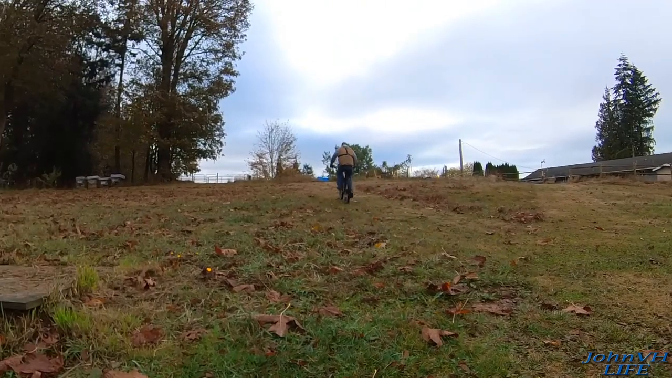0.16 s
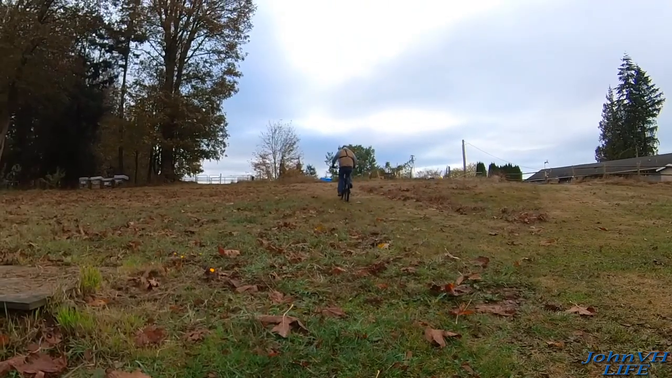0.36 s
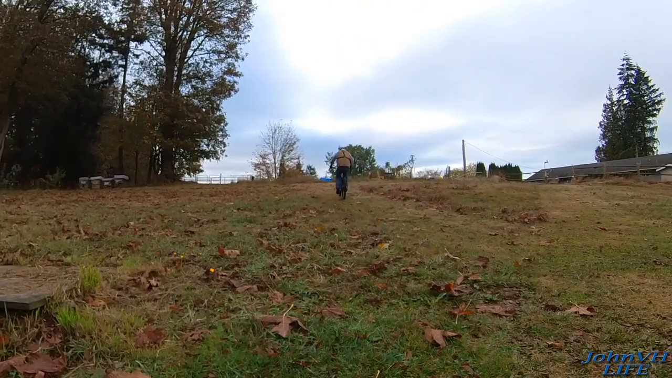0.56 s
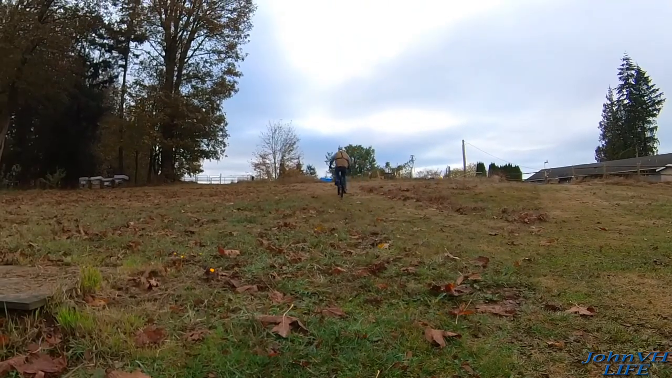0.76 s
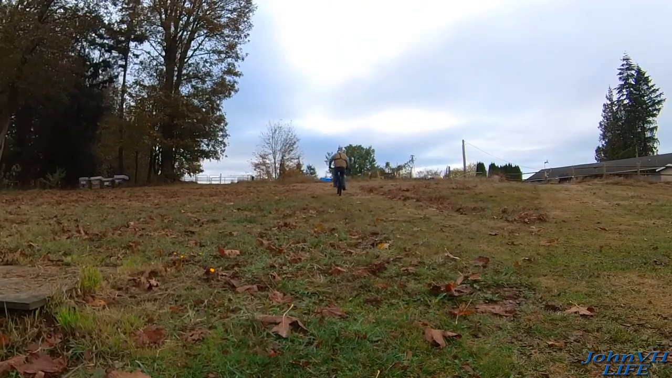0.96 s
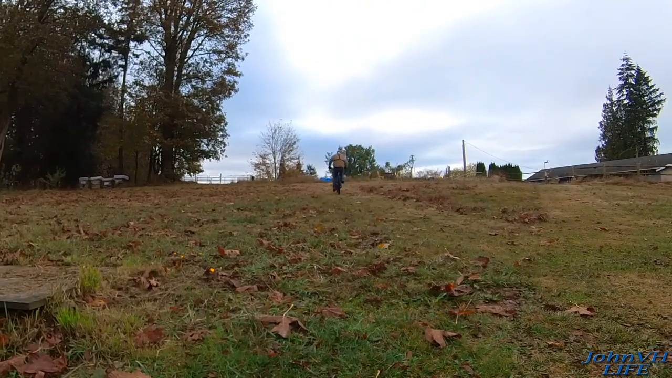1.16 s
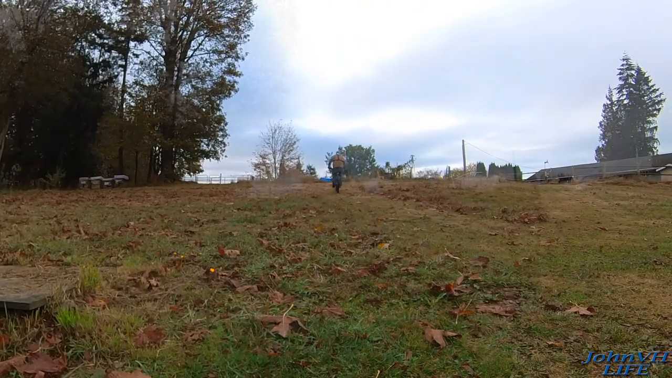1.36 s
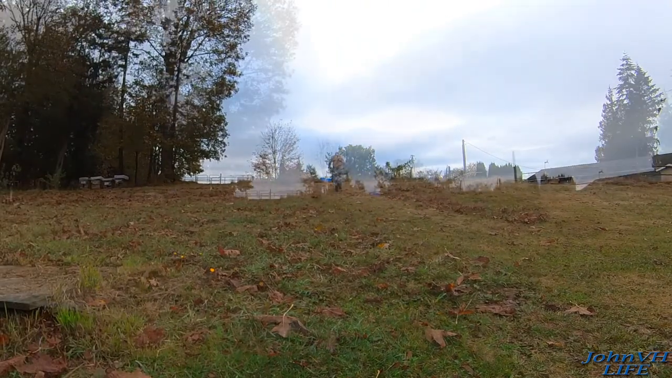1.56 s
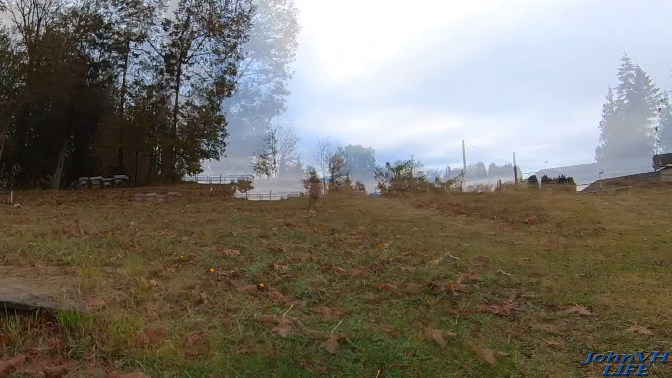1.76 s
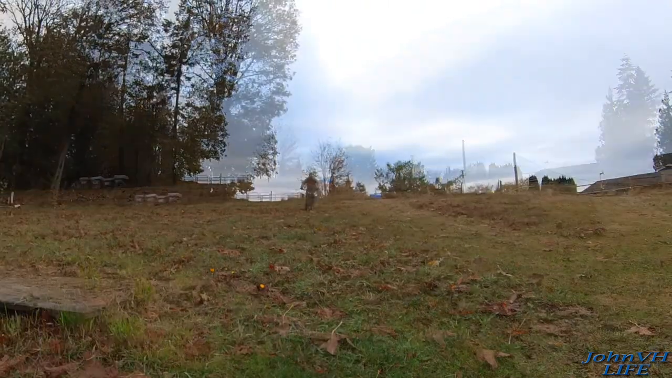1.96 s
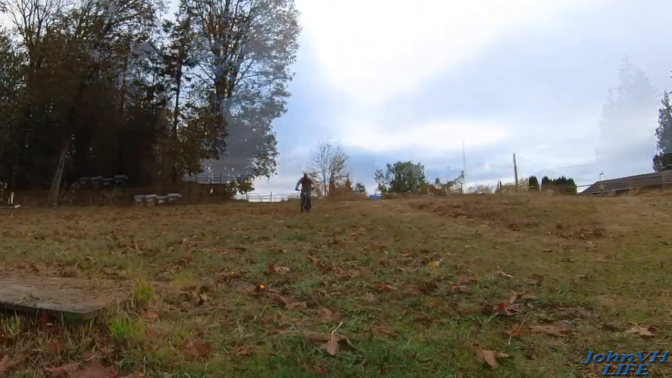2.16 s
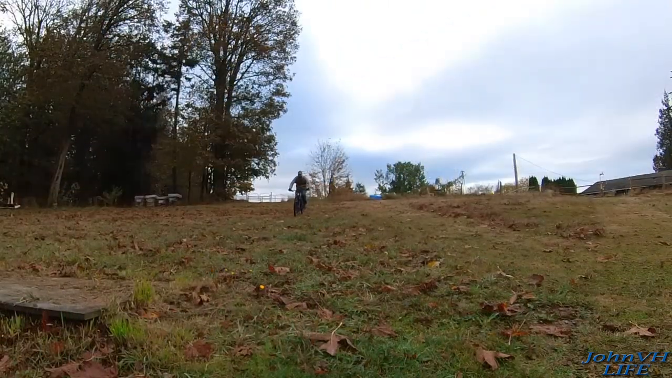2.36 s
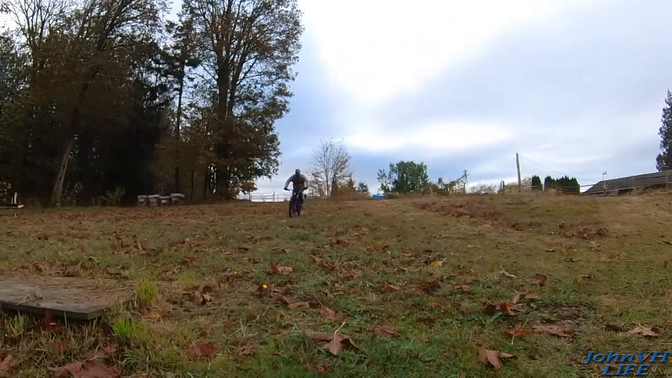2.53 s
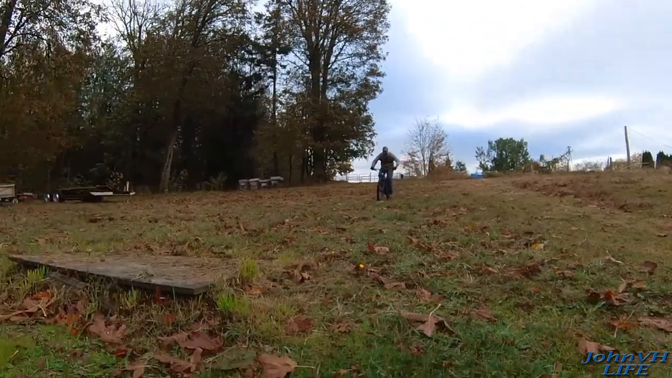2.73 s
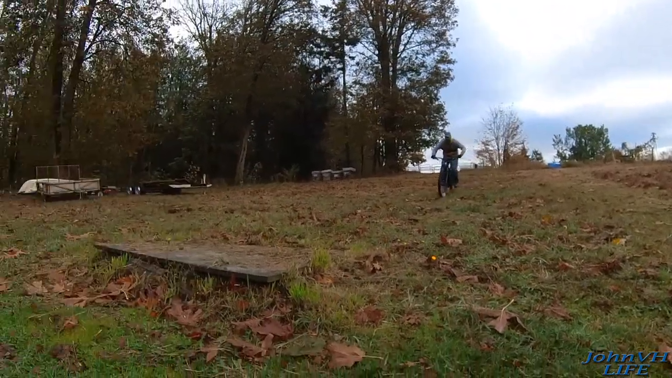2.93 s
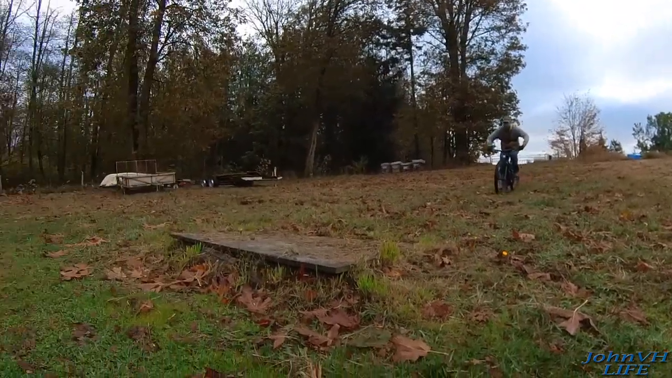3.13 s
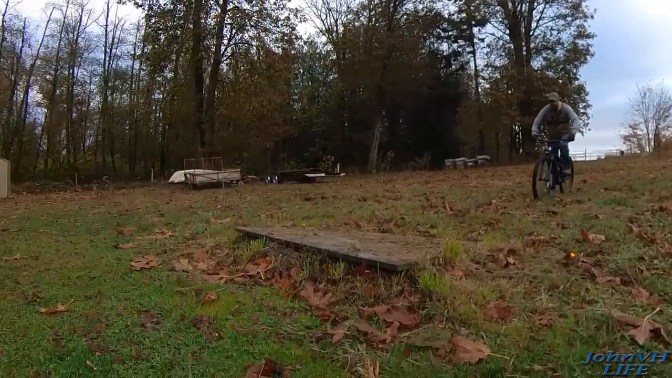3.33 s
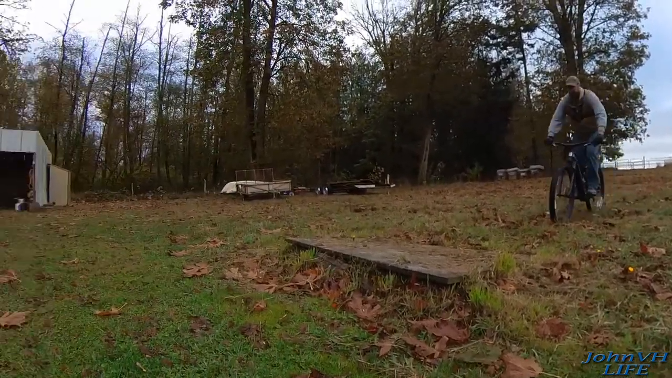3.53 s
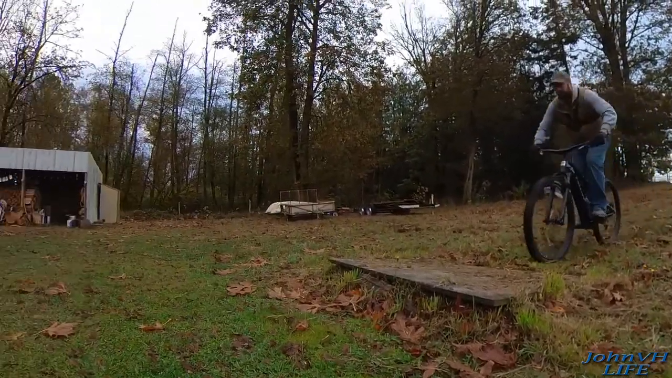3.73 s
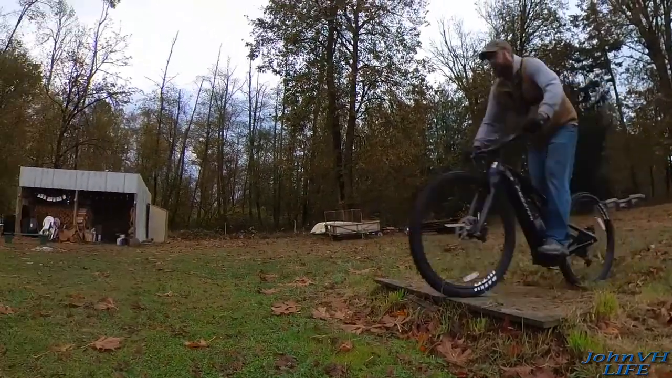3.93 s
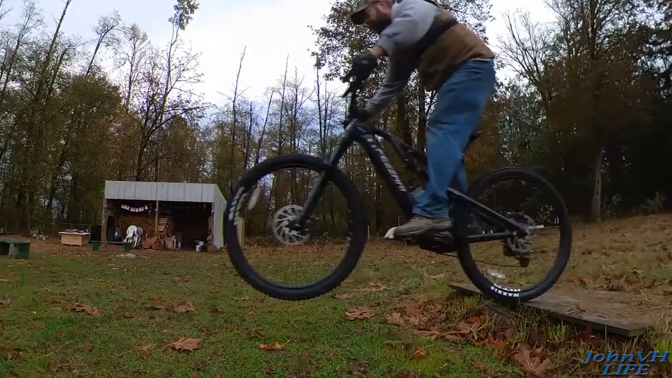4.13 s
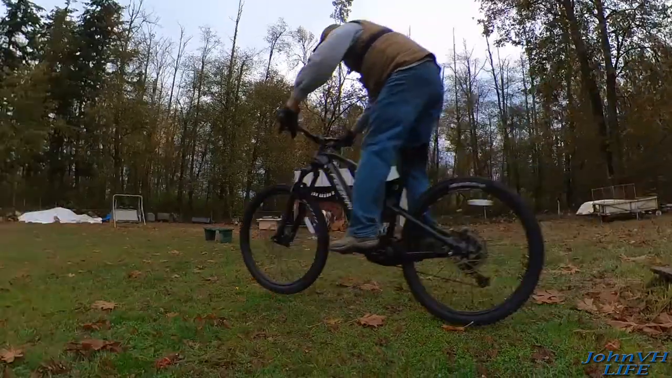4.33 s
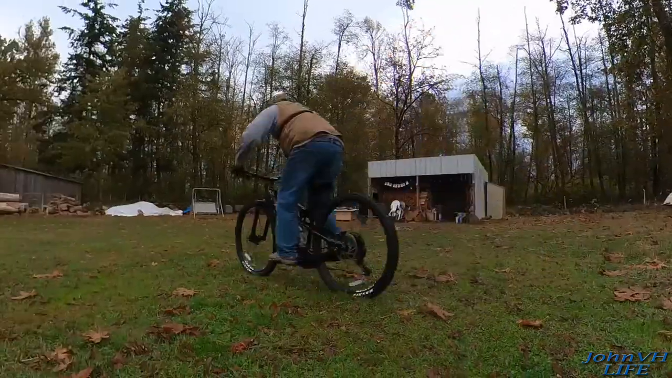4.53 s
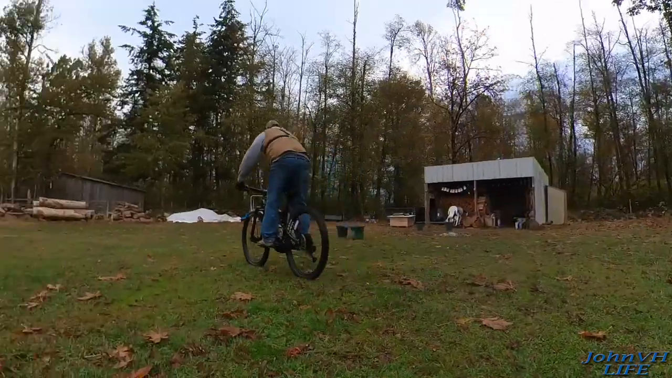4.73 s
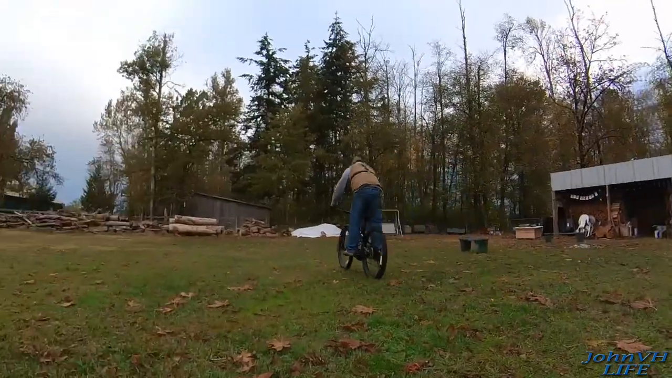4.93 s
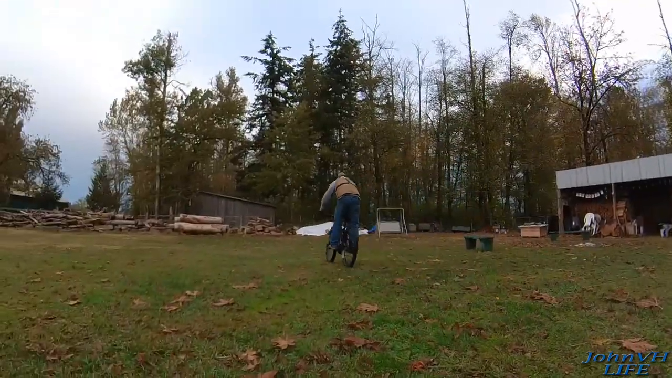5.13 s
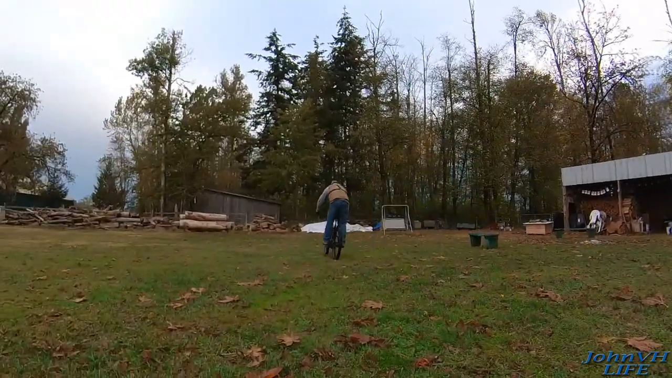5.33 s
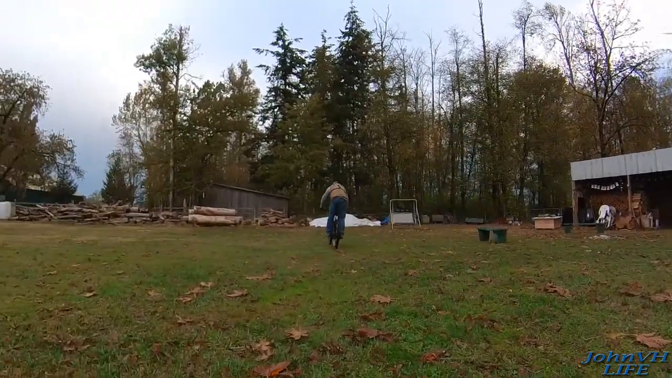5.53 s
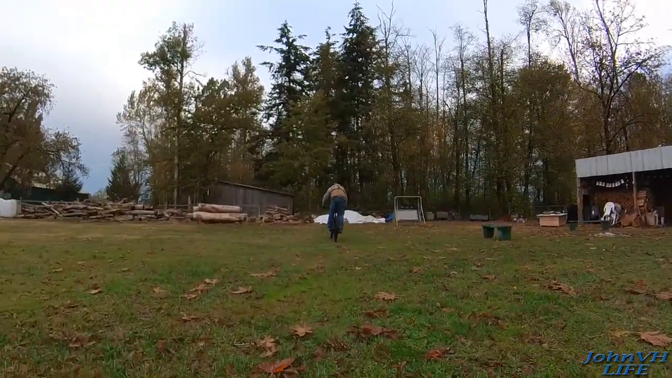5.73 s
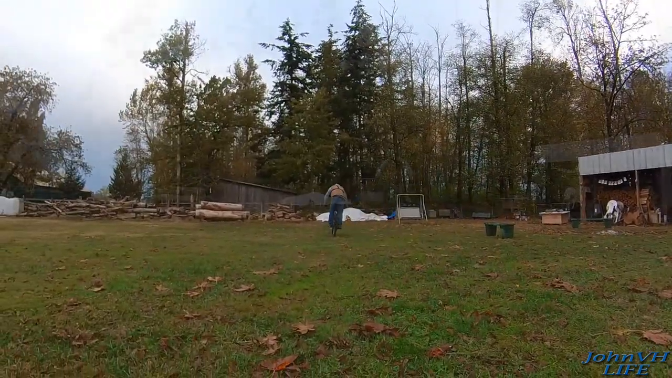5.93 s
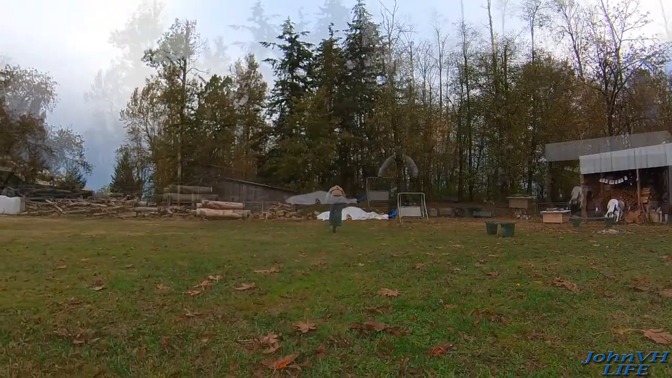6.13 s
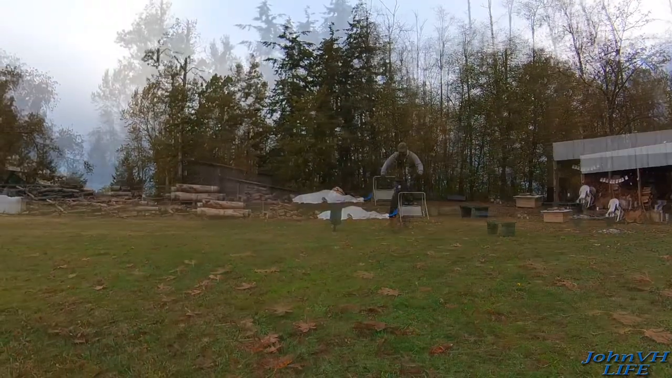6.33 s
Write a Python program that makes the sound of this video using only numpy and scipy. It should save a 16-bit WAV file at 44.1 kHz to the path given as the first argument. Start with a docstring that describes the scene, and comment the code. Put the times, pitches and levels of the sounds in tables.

```python
"""Bicycle jump off a loose board

A bicycle rolls down a leafy lawn (random grains and cracks), thuds over a loose wooden board (pushes and clicks
into ringing modes), coasts through the air with its freewheel ticking (snaps into hub modes) and lands. A far
piston engine drones in firing pulses, doubled by an echo; lumpy low noise is wind on the microphone, over hiss."""
import sys
import numpy as np
from scipy import signal
from scipy.fft import rfft, irfft, next_fast_len
from scipy.io import wavfile
from scipy.ndimage import uniform_filter1d

SR = 44100
rng = np.random.default_rng(int(sys.argv[2]) if len(sys.argv) > 2 else 0)


def int16_out(signal):
    """Quantize to a 16-bit WAV file."""
    q = np.round(np.clip(np.atleast_2d(signal).T, -1, 1) * 32767)
    wavfile.write(sys.argv[1], SR, q.astype(np.int16))


N = 286364   # length [samples]


def from_db(db):
    """Decibels to an amplitude factor."""
    return 10 ** (np.asarray(db) / 20)


def rms_one(x):
    """Scales x to an rms of 1."""
    return x / np.sqrt(np.mean(x ** 2) + 1e-20)


def white():
    """White noise over the whole scene."""
    return rng.standard_normal(N)


def in_time(rows):
    """Columns of a curve table, one value per sample."""
    s, *columns = np.transpose(rows)
    return [np.interp(np.arange(N) / SR, s, c) for c in columns]


def drift(rate_hz):
    """Slow random wandering of rms 1: low-passed noise, computed at every 40th sample."""
    r = np.exp(-80 * np.pi * rate_hz / SR)
    slow = signal.lfilter([1], [1, -2 * r, r * r], rng.standard_normal(N // 40 + 2002))
    slow = slow[2000:]   # skips the filter's start
    return np.interp(np.arange(N) / 40, np.arange(len(slow)), rms_one(slow))


def ring(x, hz, t60):
    """A decaying resonance: a unit click sets a sine of height 1 ringing, 60 dB down after t60 seconds."""
    r, w = from_db(-60 / (t60 * SR)), 2 * np.pi * hz / SR
    return signal.lfilter([0, np.sin(w)], [1, -2 * r * np.cos(w), r * r], x + 1e-18)


def band(x, low_hz, high_hz, order=2):
    """Band-pass filter."""
    sos = signal.butter(order, [low_hz, min(high_hz, .45 * SR)], "band", fs=SR, output="sos")
    return signal.sosfilt(sos, x)


def coloured(x, spectrum):
    """Shapes x by a spectrum table (frequency [Hz], relative density [dB per Hz]); rms 1."""
    hz, db = np.transpose(spectrum)
    size = next_fast_len(N)
    grid = np.maximum(np.arange(size // 2 + 1) * SR / size, 1)
    gain = from_db(np.interp(np.log(grid), np.log(hz), db))
    return rms_one(irfft(rfft(x, size) * gain, size)[:N])


# Colour of the steady hiss: (frequency [Hz], relative density [dB per Hz])
HISS_SPECTRUM = [(590, -33), (1000, -14.5), (1180, -13), (1430, -13), (2090, -12), (2270, -10),
                 (5830, -11.5), (7380, -17.5), (8770, -30), (11400, -70.5), (19300, -120)]


def air():
    """Broad hiss whose level wavers slightly."""
    return coloured(white(), HISS_SPECTRUM) * from_db(-63 + 1.1 * drift(30))


# Engine in stretches: (time [s], 4th order level [dB], 8th order level [dB],
# levels of the three exhaust bands [dB], gas puff level [dB])
ENGINE_LEVELS = [
    [(0.0, -31, -37.5, -45, -41.5, -47.5, -52), (0.268, -38, -48.5, -45, -49, -63.5, -77),
     (0.826, -41.5, -38.5, -46.5, -43.5, -69, -61), (1.038, -39, -40, -59, -52.5, -51, -68),
     (1.322, -37.5, -46, -43, -41.5, -51, -53.5), (1.82, -43, -42.5, -47, -44.5, -56.5, -74)],
    [(1.84, -43, -48, -55.5, -52, -51, -69), (1.9, -48, -55, -49.5, -58.5, -62, -62),
     (2.45, -48, -63, -50, -45, -50, -99), (2.59, -47, -50, -57, -53.5, -47.5, -62),
     (3.04, -51, -53.5, -44, -36.5, -41, -62), (3.55, -44, -41.5, -49.5, -64, -49.5, -57.5),
     (3.95, -45, -37, -45, -40.5, -47, -55.5)],
    [(4.28, -42, -38, -37, -46.5, -54, -56), (4.464, -65, -35.5, -59, -48, -50, -62),
     (4.55, -40, -40.5, -47, -43.5, -51.5, -61)],
    [(4.78, -49, -38.5, -58.5, -45, -48, -61), (5.418, -61, -38, -42.5, -48, -52.5, -60),
     (5.518, -48, -39, -50.5, -47.5, -69, -68), (5.664, -59, -45.5, -45, -50.5, -54.5, -71),
     (6.38, -49, -47.5, -51, -42, -44, -64), (6.49, -46, -41, -50, -68, -47, -55)],
]
# Engine speed: (time [s], speed [cycles per s])
ENGINE_SPEED = [(0, 18.17), (1.2, 18.13), (1.82, 18.07), (1.84, 17.81), (3.3, 17.79), (3.7, 17.75),
                (6.49, 17.73)]
# Echo of the engine off a far surface: (time [s], delay [ms])
ENGINE_ECHO = [(0, 23.2), (.45, 22.8), (.8, 21.4), (1.2, 22.4), (1.6, 23.1), (1.82, 23.4), (1.95, 24.3),
               (2.2, 24.0), (2.8, 23.1), (3.3, 22.4), (3.8, 20.8), (4.4, 19.8), (5.0, 19.6), (5.4, 19.5),
               (5.8, 18.2), (6.2, 17.7), (6.49, 17.4)]
# Exhaust resonances: (centre [Hz], half width at 1/e [Hz])
EXHAUST_BANDS = [(290, 46), (385, 59.7), (510, 83)]
# Colour of engine and distance noise: (frequency [Hz], relative density [dB per Hz])
ROAR_SPECTRUM = [(120, -30), (180, -4), (350, -6), (550, -11), (650, -13), (900, -15), (1400, -22),
                 (2500, -34), (3300, -60)]
# Swell of that noise: (time [s], relative level [dB])
ROAR_LEVELS = [(0.0, -61.5), (2.64, -61.5), (2.86, -56.5), (3.87, -61), (4.12, -57), (4.32, -59),
               (4.55, -60), (4.74, -55.5), (5.48, -63), (6.49, -58)]
SECOND_FIRING, PULSE_WIDTH = .262, .004   # delay after the first firing, half width at 1/e [cycles]
A_FIRING_S = 2.8625   # a moment when the first firing falls [s]


def engine():
    """Two uneven firings a cycle, echoed, excite exhaust bands; two sine orders, gas puffs and roar join them."""
    fourth_db, eighth_db, *bands_db, puff_db = in_time(np.vstack(ENGINE_LEVELS))
    turns = np.cumsum(in_time(ENGINE_SPEED)[0]) / SR
    turns -= turns[round(A_FIRING_S * SR)]
    fourth = from_db(fourth_db) * np.sin(8 * np.pi * turns)
    eighth = from_db(eighth_db) * np.sin(16 * np.pi * turns)
    orders = np.sqrt(2) * (fourth + eighth)   # table levels are rms

    def firing(at):
        from_centre = (turns - at + .5) % 1 - .5
        return np.exp(-(from_centre / PULSE_WIDTH) ** 2)

    pulses = (firing(0) + 0.79 * firing(SECOND_FIRING)) * from_db(0.63 * drift(16))
    late = np.arange(N) - in_time(ENGINE_ECHO)[0] * SR / 1000
    pulses += 0.93 * np.interp(late, np.arange(N), pulses)

    size = next_fast_len(N)
    spectrum, grid = rfft(pulses, size), np.arange(size // 2 + 1) * SR / size
    bands = []
    for hz, half_width in EXHAUST_BANDS:
        resonance = np.exp(-((grid - hz) / half_width) ** 2)
        bands.append(rms_one(irfft(-spectrum * resonance, size)[:N]))
    exhaust = sum(from_db(db) * x for x, db in zip(bands, bands_db))

    # turbulent gas follows the top exhaust band
    puffs = band(white() * (np.abs(bands[2]) + 0.33), 714, 1033)
    roar_db = in_time(ROAR_LEVELS)[0] + 12.0 + 1.83 * drift(5.2)
    roar = coloured(white(), ROAR_SPECTRUM) * from_db(roar_db)
    return orders + exhaust + from_db(puff_db) * rms_one(puffs) + roar


# Colour of the wind: (frequency [Hz], relative density [dB per Hz])
WIND_SPECTRUM = [(12, -40), (20, -10), (70, -5), (88, -8.5), (108, -5.5), (135, -13.5), (220, -15),
                 (290, -66), (480, -120)]
# Gusts in stretches: (time [s], relative level [dB])
GUST_LEVELS = [
    [(0.0, -45.5), (0.33, -35), (0.46, -44.5), (0.78, -41.5), (1.08, -41.5), (1.15, -48), (1.42, -48.5),
     (1.98, -39), (2.12, -49), (2.33, -40.5), (3.4, -46.5), (3.51, -43), (3.73, -42), (3.95, -36)],
    [(4.28, -39), (4.338, -35), (4.55, -38)],
    [(4.78, -37.5), (5.112, -40), (5.164, -44.5), (5.508, -34.5), (5.788, -40), (6.018, -38), (6.49, -33)],
]
# Dull low bumps: (time [s], relative level [dB], pitch [Hz])
WIND_BUMPS = [(0.094, -28, 82), (0.124, -34, 64), (0.206, -31, 86.1), (0.299, -31, 53.8), (0.342, -29, 81),
              (0.811, -31.5, 59.2), (1.161, -26.5, 60.6), (1.899, -31, 54.5), (1.959, -32, 51.1),
              (2.34, -37, 66), (3.829, -26, 140), (5.079, -33, 68), (5.503, -23.5, 67.3),
              (5.589, -21.5, 113), (5.641, -28.5, 108), (6.24, -26, 109), (6.381, -28, 61.9)]


def wind():
    """Light wind buffets the microphone: lumpy low noise, and single dull bumps of two dying cycles."""
    gust_db = in_time(np.vstack(GUST_LEVELS))[0] - 1.0 + 1.46 * drift(8.5)
    out = coloured(white(), WIND_SPECTRUM) * from_db(gust_db)
    for s, db, hz in WIND_BUMPS:
        cycles = np.arange(int(2 * SR / hz)) * hz / SR
        at = round(s * SR)
        bump = np.sin(2 * np.pi * cycles) * np.exp(-1.2 * cycles)
        out[at:at + len(cycles)] -= 1.62 * from_db(db) * bump
    return out


# Colour of the leaf rustle: (frequency [Hz], relative density [dB per Hz])
RUSTLE_SPECTRUM = [(710, -29.5), (1200, -9.5), (1630, -17.5), (1880, -12.5), (2240, -12), (6080, -10),
                   (7240, -15.5), (8770, -15.5), (11400, -57.5), (19300, -120)]
# Tyres rustling in grass and leaves: (time [s], level [dB])
RUSTLE_LEVELS = [(1.8, -66.5), (3.07, -60), (3.48, -56), (3.95, -55.5), (4.1, -47), (4.57, -49.5),
                 (4.66, -41), (4.9, -55.5), (5.57, -65), (6.49, -63.5)]
# Leaves and grit cracking: (time [s], relative level [dB], tail centre [Hz], tail t60 [s])
LEAF_CRACKS = [(2.208, -40, 5860, 0.078), (2.4124, -44, 5550, 0.081), (2.4403, -38, 2400, 0.055),
               (2.6817, -44, 5730, 0.079), (3.1602, -40, 4060, 0.082), (3.1794, -42, 4060, 0.076),
               (3.245, -40, 5060, 0.07), (3.2984, -38, 5410, 0.084), (3.353, -39, 5925, 0.077),
               (3.437, -46, 5200, 0.07), (3.489, -36, 6300, 0.07), (3.5386, -44, 5220, 0.07),
               (3.681, -38, 7000, 0.081), (3.921, -25.5, 3226, 0.064), (3.9505, -39, 3200, 0.07),
               (3.9885, -28.5, 5760, 0.07), (4.0067, -17.5, 2800, 0.044), (4.0227, -21.5, 5450, 0.07),
               (4.0706, -36, 3100, 0.07), (4.1051, -23.5, 2700, 0.058), (4.1746, -28, 4800, 0.1),
               (4.1894, -28, 2640, 0.077), (4.2946, -42, 3060, 0.07), (4.6189, -18, 6050, 0.077),
               (4.644, -28, 4640, 0.07), (4.6542, -17.5, 4700, 0.085), (4.8055, -30, 2780, 0.086),
               (5.003, -39, 2616, 0.07)]


def tyres():
    """Dense small grains while rolling, and single cracks: a snap, then noise that dies."""
    grain_chance = 3000 * from_db(3.0 * drift(25)) / SR   # about 3000 a second
    grains = (rng.random(N) < grain_chance) * from_db(2.06 * rng.exponential(1, N))
    rustle = coloured(grains * white(), RUSTLE_SPECTRUM)
    out = rustle * from_db(in_time([(1.79, -88)] + list(RUSTLE_LEVELS))[0])
    t = np.arange(SR // 8) / SR
    for s, db, hz, t60 in LEAF_CRACKS:
        burst = rng.standard_normal(len(t))
        snap = band(burst, 1200, 9000, order=1) * from_db(-60 * t / .008)   # gone in 8 ms
        tail = rms_one(band(burst, hz / 1.45, hz * 1.45)) * from_db(-60 * t / t60)
        out[round(s * SR):][:len(t)] += from_db(db - 8.0) * (1.3 * snap + 0.58 * tail)
    return out


# Freewheel loudness: (time [s], relative level [dB])
FREEWHEEL_LEVELS = [(3.5, -66), (3.81, -60), (4.0, -52.5), (4.01, -41), (4.02, -58), (4.05, -53.5),
                    (4.12, -50.5), (4.27, -66), (4.3, -45.5), (4.47, -49), (4.52, -39), (4.54, -45.5),
                    (4.66, -45), (4.7, -50.5), (5.29, -59), (6.49, -66)]
# Ratchet rate: (time [s], rate [ticks per s])
TICK_RATE = [(0, 100), (4.3, 100.6), (5.1, 101), (5.5, 93), (6.04, 80), (6.49, 72)]
# Hub resonances: (frequency [Hz], relative level [dB], t60 [s])
HUB_MODES = [(2000, -24, 0.0094), (2626, -3, 0.03), (2924, -2.5, 0.021), (3050, 4.5, 0.015),
             (3690, -3.5, 0.026), (5030, -14.5, 0.0081), (5940, -11, 0.02), (6700, -7, 0.016),
             (7330, -5, 0.011)]
A_TICK_S = 4.5115   # a tick falls near here [s]


def freewheel():
    """Pawls snap over the ratchet: short noisy scrapes strike hub modes whose strengths drift."""
    teeth = np.cumsum(in_time(TICK_RATE)[0]) / SR
    teeth += .04 * drift(40) - teeth[round(A_TICK_S * SR)]   # slightly uneven ticks
    from_tooth = (teeth + .5) % 1 - .5
    snaps = np.exp(-from_tooth ** 2 / .09 ** 2) + .17   # .17: looser rattle between the snaps
    rings = np.zeros(N)
    for hz, db, t60 in HUB_MODES:
        rings += from_db(db + 2.1 * drift(20)) * ring(snaps * white(), hz, t60)
    running_rms = np.sqrt(uniform_filter1d(rings ** 2, size=SR // 10) + 1e-12)   # over 0.1 s
    level_db, = in_time([(3.45, -87.5)] + list(FREEWHEEL_LEVELS))
    return rings / running_rms * from_db(level_db + 1.0)


# Tread knobs and grit under load, first board then ground: (time [s], relative level [dB])
CLATTER_LEVELS = [
    [(3.97, -63), (3.99, -48), (4.01, -36.5), (4.03, -45), (4.045, -31), (4.07, -38.5), (4.10, -37.5),
     (4.12, -31.5), (4.145, -39.5), (4.18, -35.5), (4.2, -46), (4.22, -37), (4.25, -56), (4.28, -65)],
    [(4.58, -51.5), (4.61, -39.5), (4.65, -43), (4.665, -27), (4.69, -41), (4.72, -50), (4.85, -61)],
]
# Short woody resonances: (frequency [Hz], relative level [dB], t60 [s])
WOODY_MODES = [(617, 8, 0.024), (850, -2, 0.017), (1220, -5, .015), (1570, -2.5, 0.0099), (2020, -7, 0.025),
               (2580, -7, 0.016)]


def clatter():
    """Dense uneven clicks into short woody modes while a wheel bears down."""
    clicks = (rng.random(N) < 1200 / SR) * from_db(2.7 * rng.exponential(1, N))   # about 1200 a second
    rings = sum(from_db(db) * ring(clicks * white(), hz, t60) for hz, db, t60 in WOODY_MODES)
    board, ground = CLATTER_LEVELS
    between = [(4.3, -90), (4.55, -95)]
    level_db, = in_time([(3.95, -88)] + list(board) + between + list(ground) + [(4.9, -84)])
    return rms_one(rings) * from_db(level_db + 2.0)


# Tyre blows on board and ground: (time [s], relative level [dB], contact pitch [Hz], direction [+1 or -1])
TYRE_BLOWS = [(3.985, -35, 249, -1), (4.007, -9.5, 80, 1), (4.037, -13.5, 296, -1), (4.045, -8.5, 148, -1),
              (4.071, -15.5, 156, -1), (4.099, -22, 354, 1), (4.151, -20.5, 290, 1), (4.176, -11, 70, 1),
              (4.192, -9, 90, 1), (4.213, -15.5, 296, -1), (4.221, -9, 221, -1), (4.584, -23, 89, 1),
              (4.611, -18, 69, 1), (4.641, -19.5, 49.7, -1), (4.66, -15.5, 308, -1), (4.682, -19.5, 280, 1),
              (4.705, -23.5, 184, 1), (4.725, -25.5, 153, -1)]
# Resonances that every blow drives: (frequency [Hz], relative level [dB], t60 [s])
BOARD_MODES = [(44.8, -11, 0.13), (69.6, -1, 0.069), (104, 2.5, 0.072), (162.3, -0.5, 0.083),
               (263.4, 1.5, 0.074), (335.6, 6.5, 0.032), (493, 1, 0.048), (770, 2.5, 0.11),
               (1150, -39, .04)]


def blows():
    """Each contact is one push and release; its length decides which modes it reaches."""
    push = np.zeros(N)
    for s, db, hz, direction in TYRE_BLOWS:
        cycle = np.arange(int(SR / hz)) * hz / SR
        contact = np.sin(2 * np.pi * cycle) * np.sin(np.pi * cycle)
        contact *= hz / SR   # long contacts push no harder in total
        push[round(s * SR):][:len(cycle)] += np.sign(direction) * from_db(db) * contact
    return 2.41 * sum(from_db(db) * ring(push, hz, t60) for hz, db, t60 in BOARD_MODES)


def scene():
    """All layers summed, the same in both channels."""
    mix = air() + engine() + wind() + tyres() + freewheel() + clatter() + blows()
    return np.array([mix, mix])


CUTOFF_HZ = 9700   # 60 dB down from here up


def record(dry):
    """Close microphones: alike except from 3 to 6 kHz, where scattered sound differs; peaks rounded, top cut."""
    treble = signal.hilbert(band(dry[0], 3050, 6100, order=6), next_fast_len(N))[:N]
    side = np.real(treble * np.exp(3j * drift(60)))   # scattering: the phase wanders quickly
    side = from_db(-8) * band(side, 3050, 6400, order=4)
    wide = .5 * np.tanh(dry / .5) + side * [[1], [-1]]
    return signal.sosfilt(signal.cheby2(10, 60, CUTOFF_HZ, fs=SR, output="sos"), wide)


dry = scene()
out = record(dry)
int16_out(out)
```